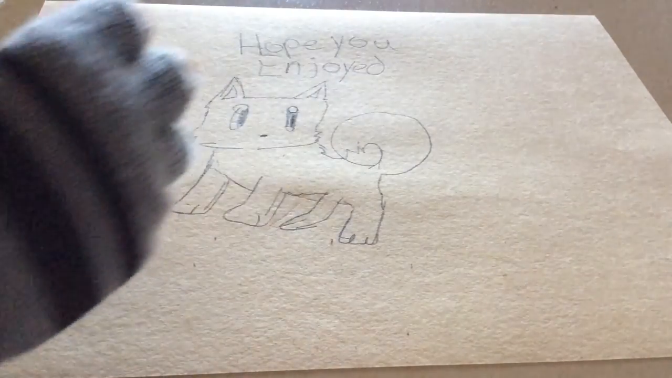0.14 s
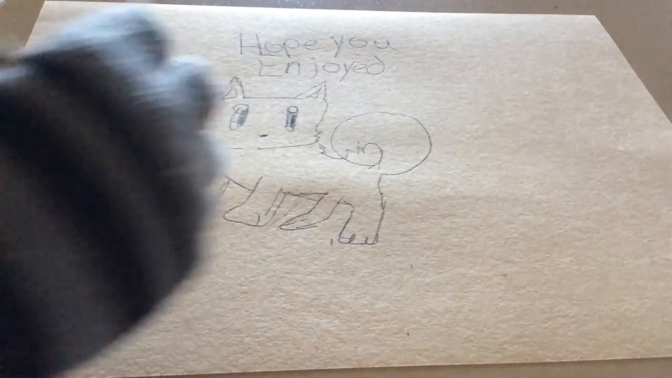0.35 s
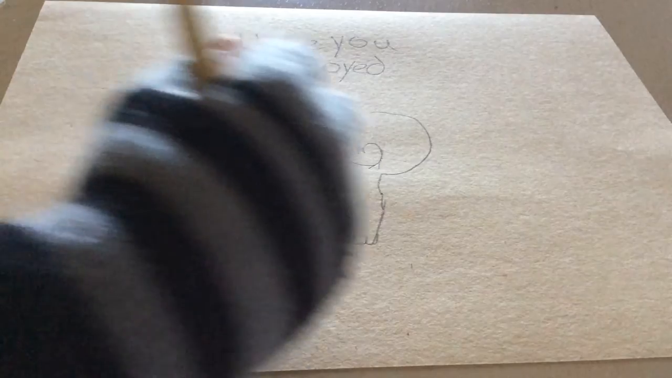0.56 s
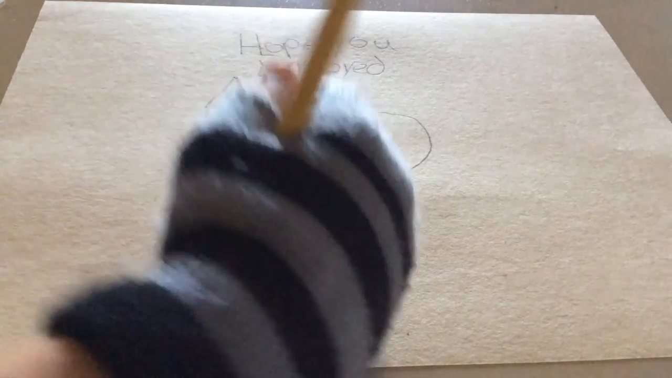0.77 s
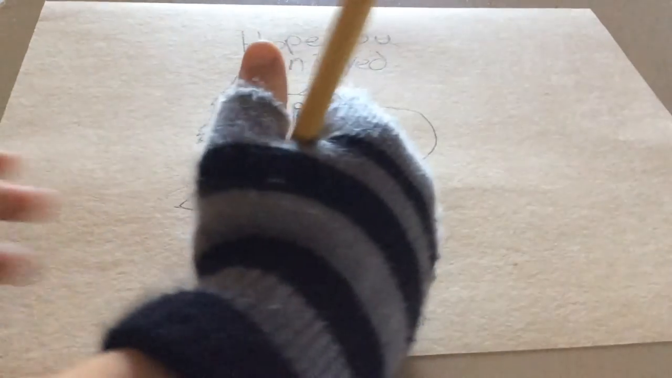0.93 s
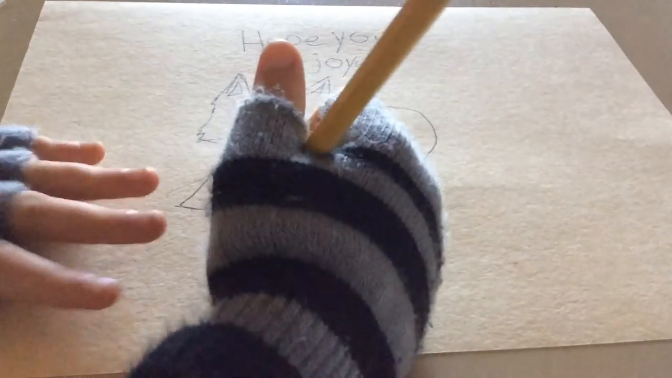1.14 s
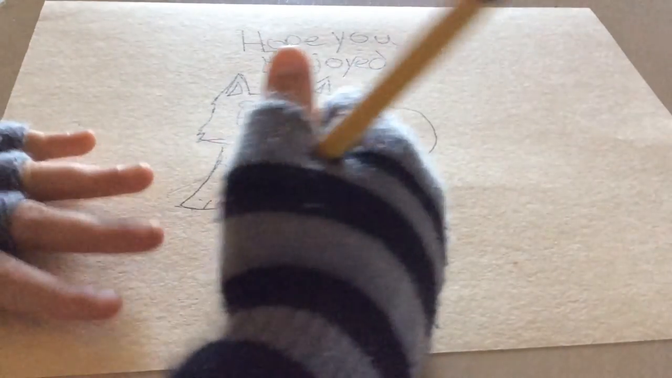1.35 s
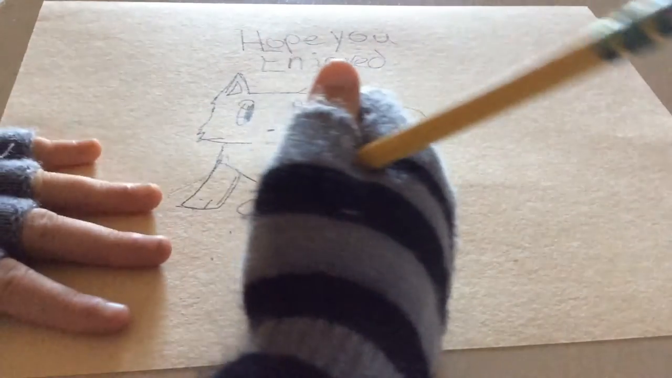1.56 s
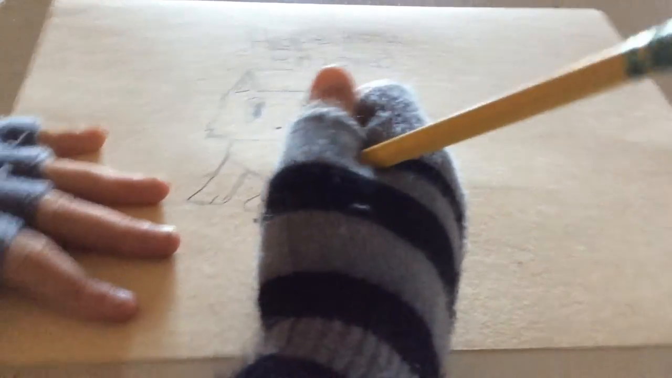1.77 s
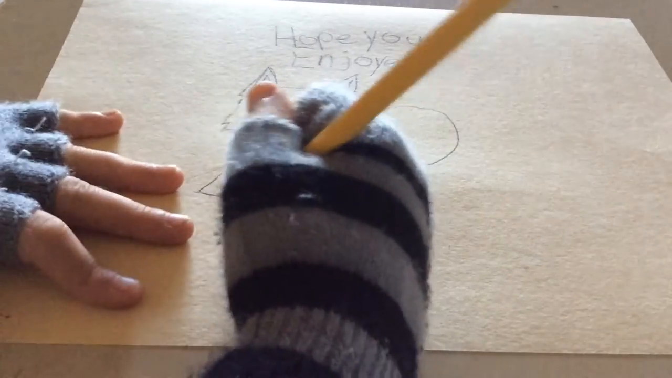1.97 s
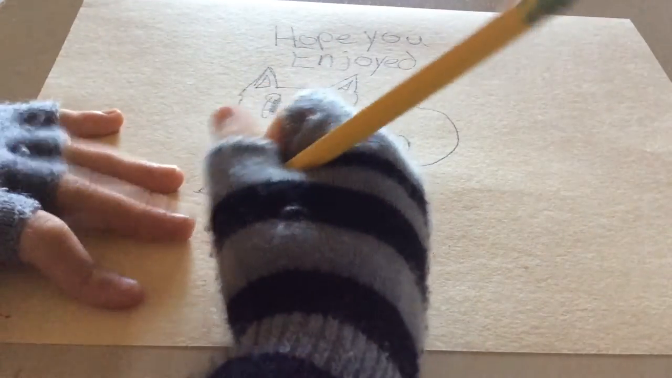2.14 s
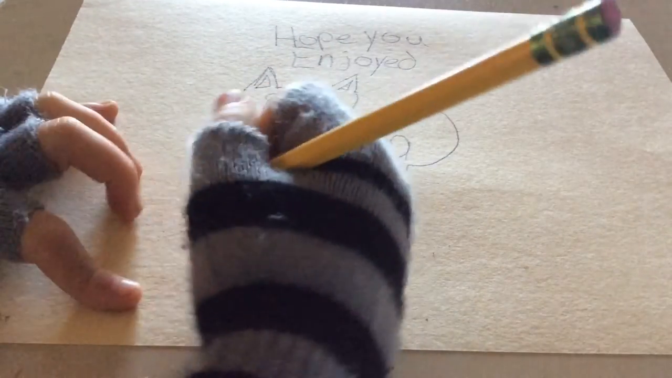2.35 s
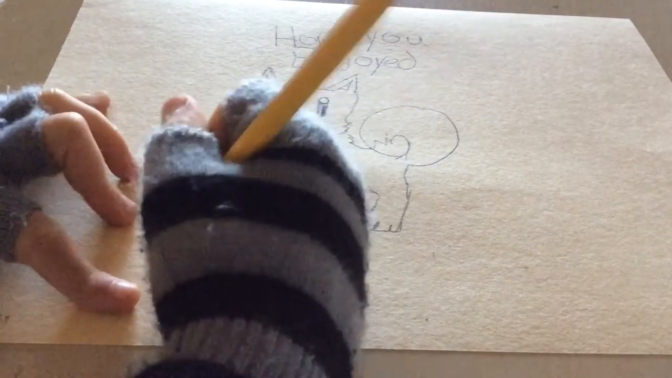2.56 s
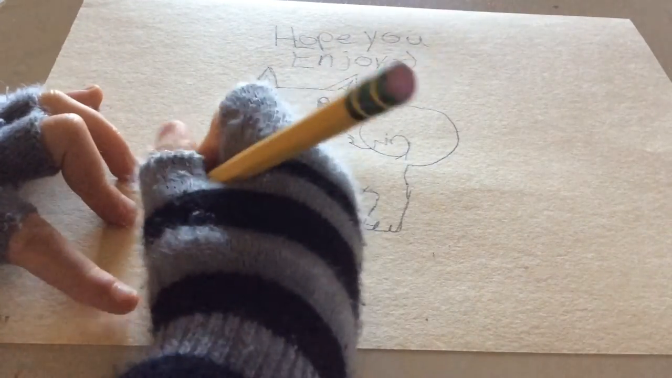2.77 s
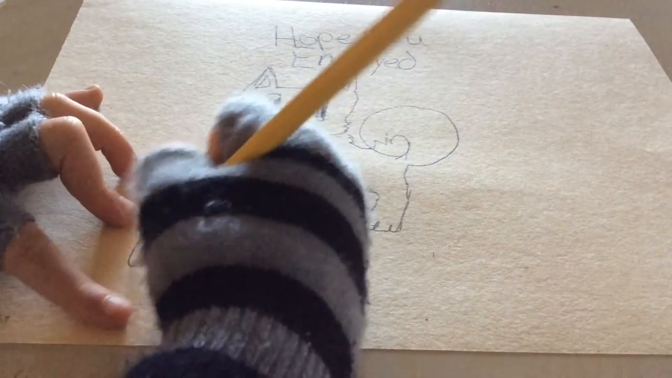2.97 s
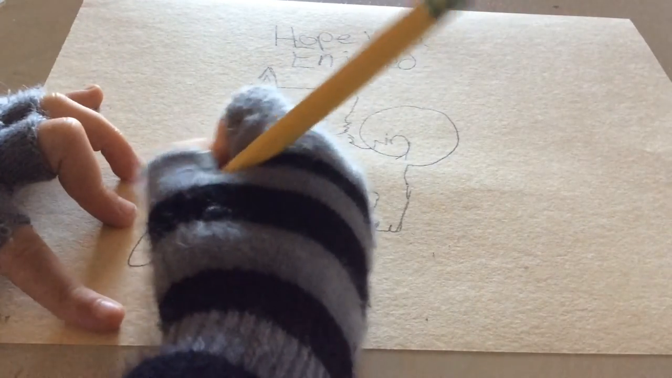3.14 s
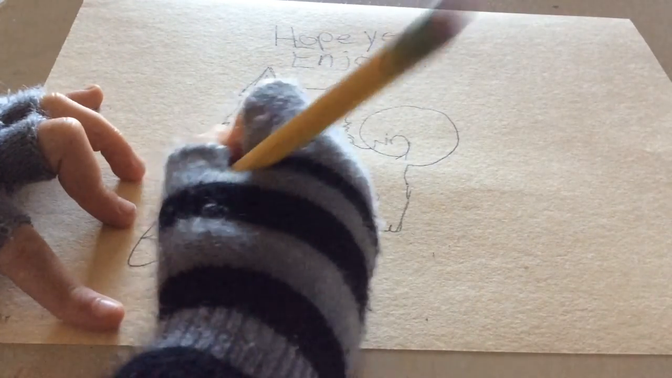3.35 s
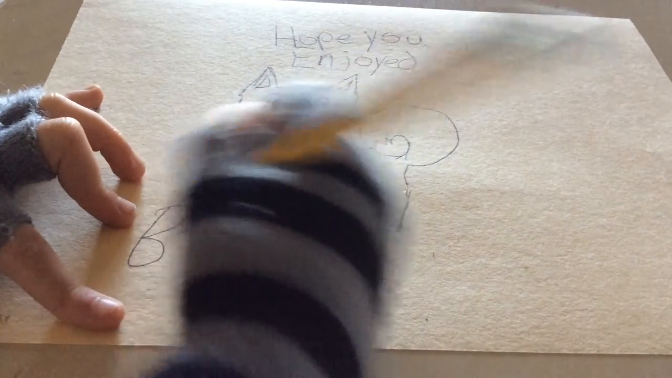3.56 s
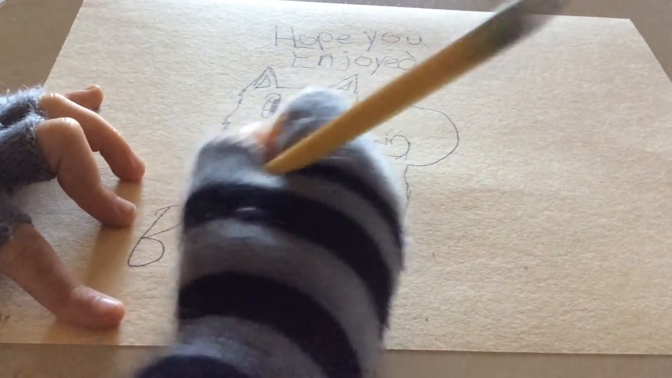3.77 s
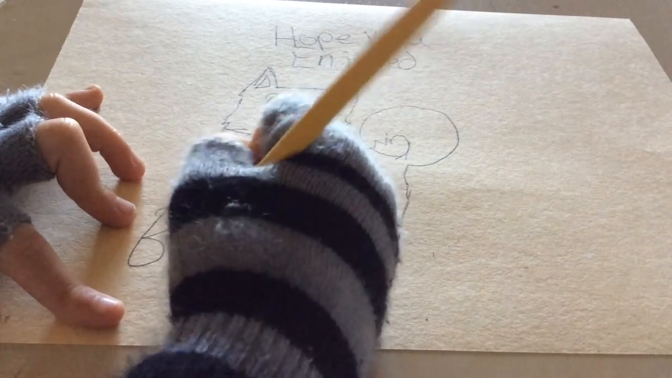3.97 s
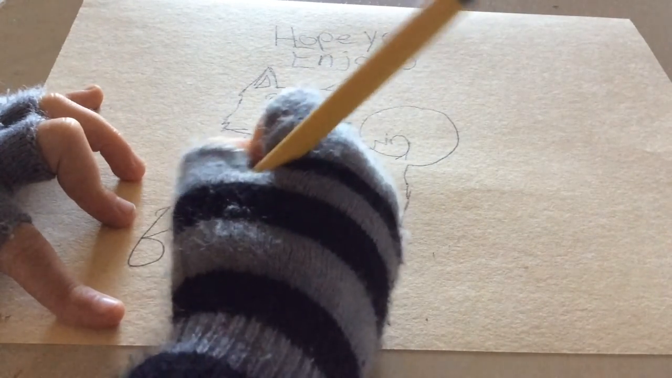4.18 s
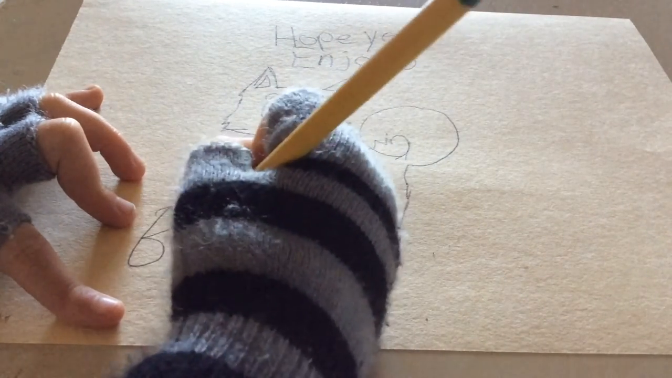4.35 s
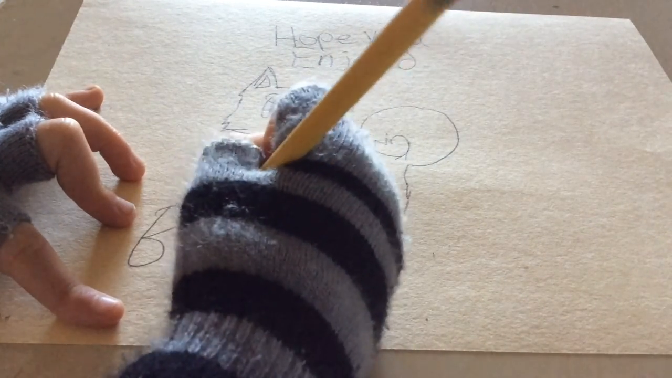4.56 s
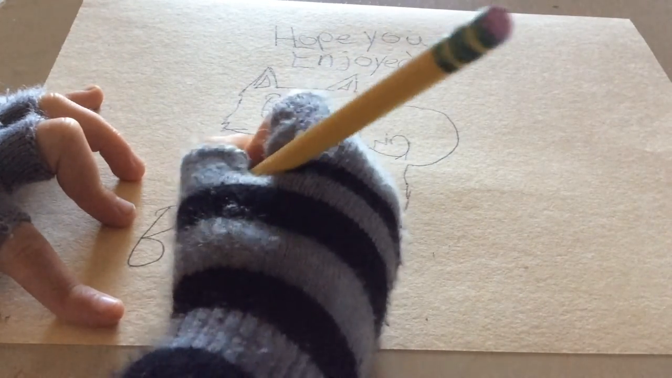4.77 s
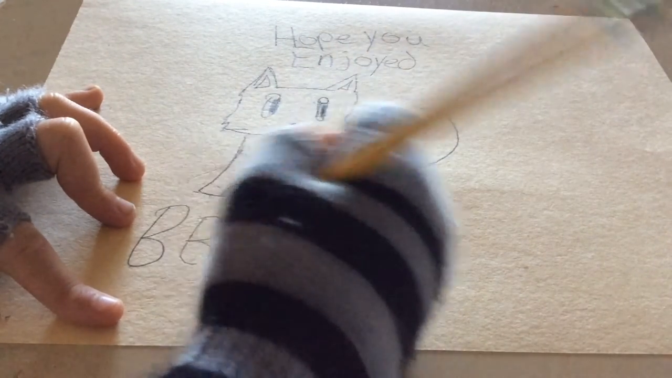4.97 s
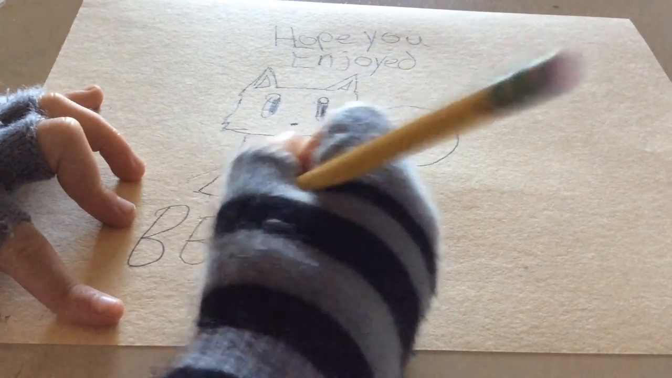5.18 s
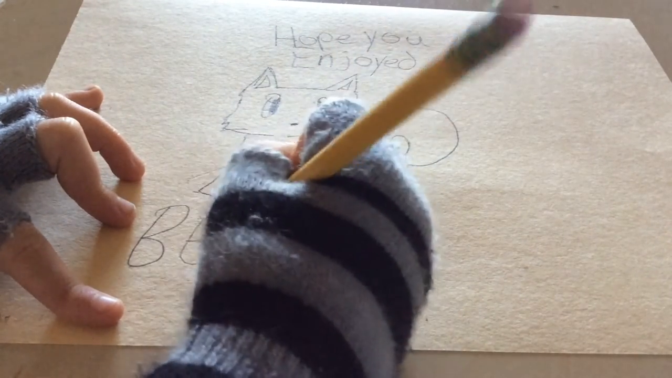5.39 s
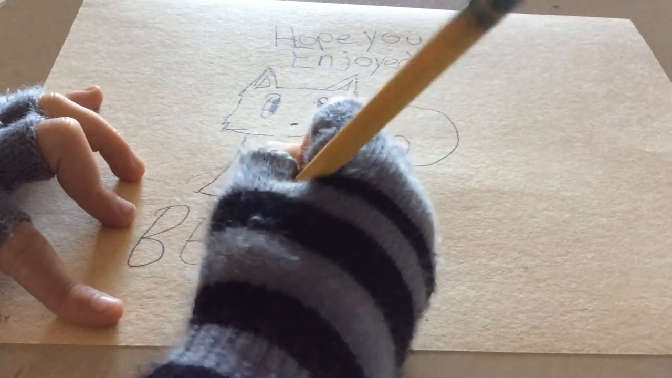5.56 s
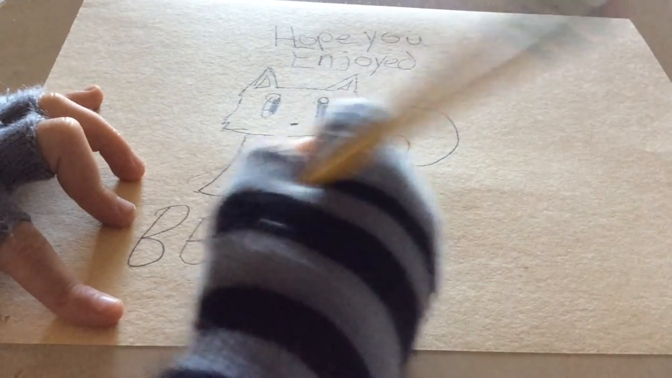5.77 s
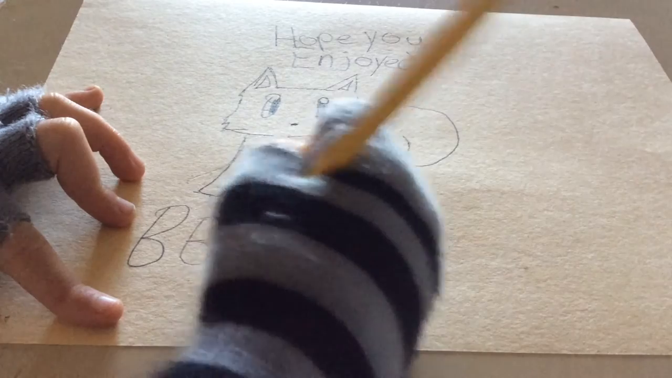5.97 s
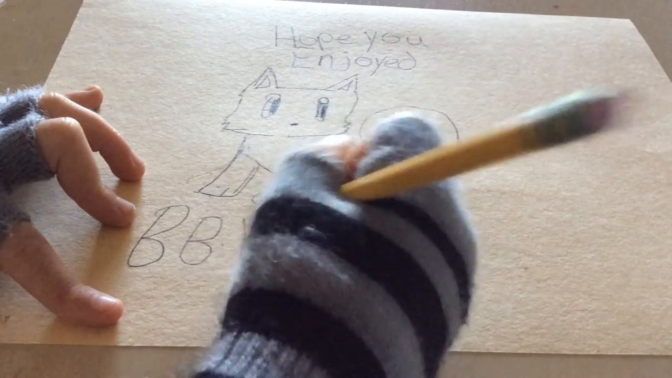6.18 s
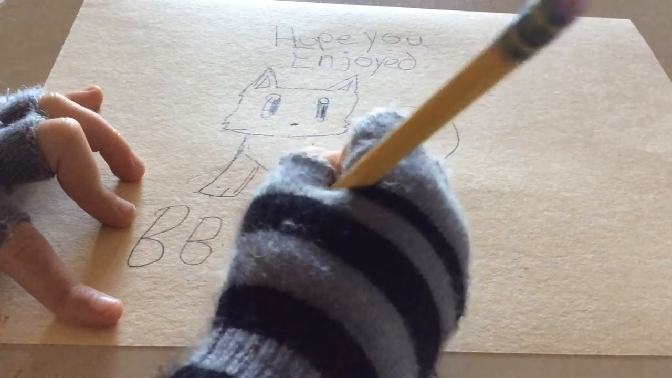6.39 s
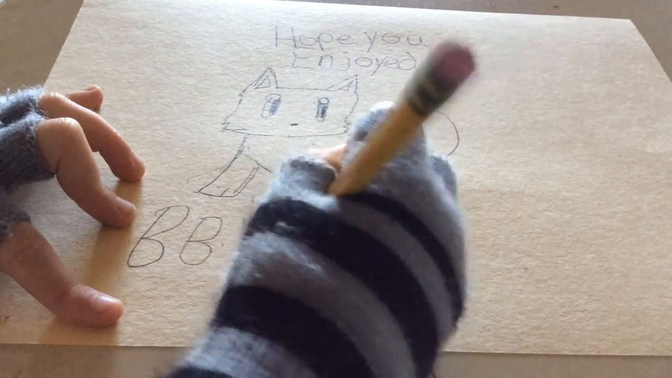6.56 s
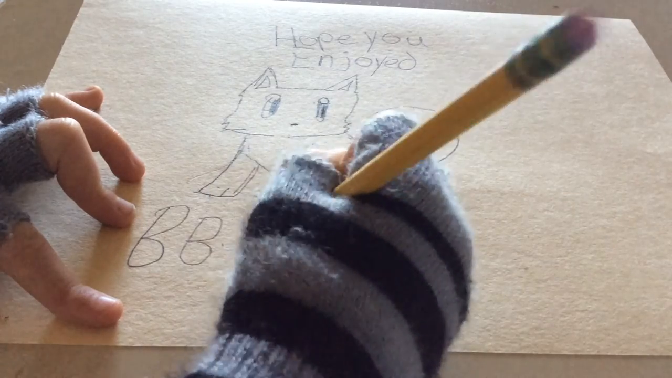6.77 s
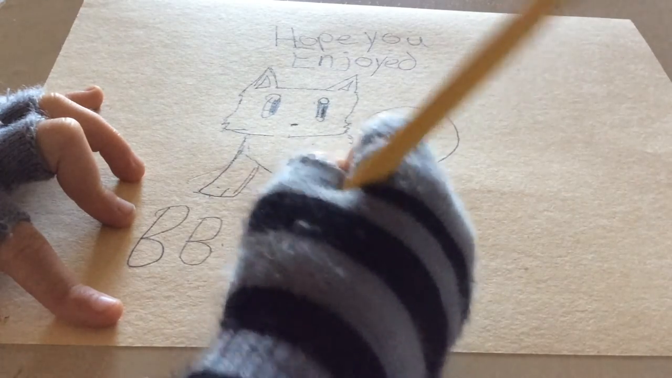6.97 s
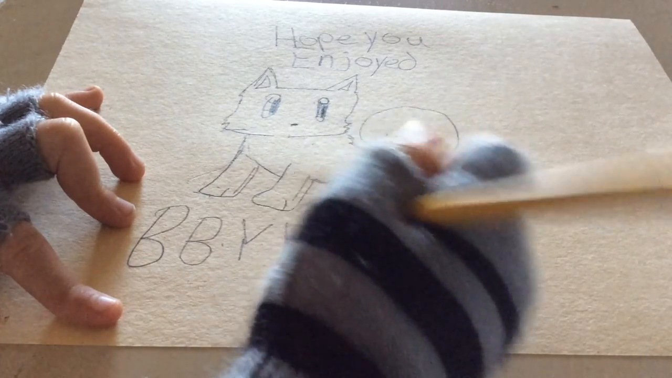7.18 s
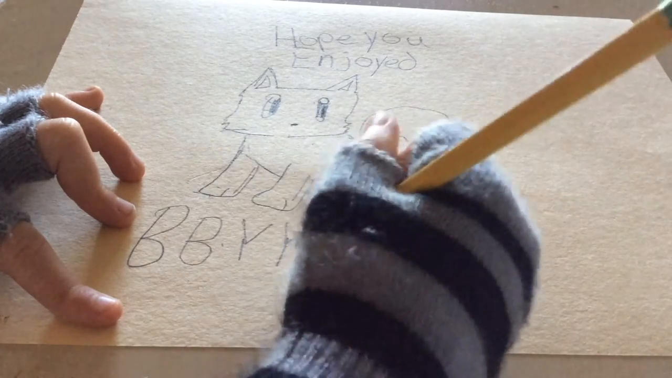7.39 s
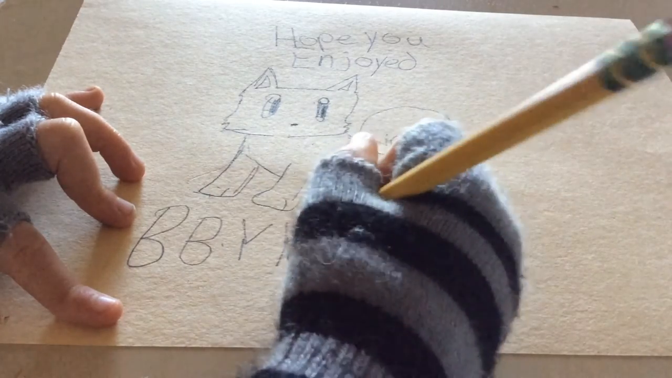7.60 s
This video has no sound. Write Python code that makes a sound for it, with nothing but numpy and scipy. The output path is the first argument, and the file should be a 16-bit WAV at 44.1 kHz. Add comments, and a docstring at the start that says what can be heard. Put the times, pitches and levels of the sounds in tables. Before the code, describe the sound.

Pencil lead taps and scrapes in short irregular bursts on paper over a resonant desk, after soft knit brushing and finger clicks, in a quiet room

```python
"""Pencil writing on a hollow desk

A gloved hand writes with a pencil on a sheet lying on a hollow wooden desk, close to the microphone.
The lead lands with a knock (blows on damped modes), then hisses over the paper grain (coloured friction
noise) while its drag shakes the desk (noise force on the same modes). The knitted glove brushes the sheet
in softer noise, the arm rumbles, and the pencil clicks as it is regripped (short bursts). A quiet room."""
import sys
import numpy as np
from scipy import signal
from scipy.fft import rfft, irfft, next_fast_len
from scipy.io import wavfile
from scipy.ndimage import uniform_filter1d, map_coordinates

SR = 44100
rng = np.random.default_rng(int(sys.argv[2]) if len(sys.argv) > 2 else 0)


def materialize(psi):
    """Save the field psi as 16-bit PCM at rate SR to the path in sys.argv[1].

    A 1-D psi becomes a single channel; in a 2-D psi each row is a channel.
    """
    bounded = np.clip(np.atleast_2d(psi).T, -1, 1)
    quanta = np.round(bounded * 32767).astype(np.int16)
    wavfile.write(sys.argv[1], SR, quanta)


N = 336483

# Strokes of the lead; levels are relative to each layer's own gain:
# (start [s], length [s], fastest point [0-1 of length], heaviest point [0-1 of length], swell depth [dB],
#  hiss [dB], scrape [dB], desk shaking [dB], arm weight [dB], pencil upright [0-1])
STROKES = [ (2.854, 0.1, 0.78, 0.52, 7.5, -57, -56, -38.5, -54, 0.39),
           (2.926, 0.081, 0.36, 0.25, 8.5, -56.5, -60.5, -36, -56, 0.15),
           (3.026, 0.067, 0.74, 0.35, 6, -64.5, -61.5, -41.5, -54, 0.45),
           (3.089, 0.09, 0.73, 0.9, 9, -56.5, -59.5, -52, -61.5, 0.15),
           (3.174, 0.079, 0.55, 0.5, 7.5, -67.5, -63, -52, -57.5, 0.38),
           (3.292, 0.095, 0.62, 0.41, 15.5, -54, -58.5, -40, -59, 0.5),
           (3.366, 0.085, 0.3, .45, 8.5, -62, -59.5, -49, -57, 0.38),
           (3.447, 0.12, .45, 0.17, 14, -61.5, -63, -49.5, -55, 0.4),
           (3.894, 0.082, 0.56, 0.52, 8.5, -53, -57, -37, -58, 0.56),
           (3.976, 0.07, 0.66, 0.96, 9, -66.5, -68, -53.5, -61, 0.5),
           (4.04, 0.055, 0.8, 0.38, 5, -71, -67.5, -50.5, -56, 0.5),
           (4.089, 0.06, 0.9, 0.66, 7.5, -57.5, -63, -52.5, -56, 0.57),
           (4.149, .12, 0.16, 0.31, 9.5, -64.5, -60.5, -49, -53.5, 0.38),
           (4.312, 0.064, 0.9, 0.32, 8, -70, -70, -57.5, -62, 0.4),
           (4.469, 0.11, 0.61, 0.46, 12, -66, -65, -50, -67, 0.34),
           (4.582, 0.12, 0.17, 0.52, 7.5, -61.5, -61.5, -53.5, -64, 0.77),
           (4.714, 0.11, 0.9, 0.25, 6.5, -65, -64.5, -55, -59.5, 0.44),
           (4.845, 0.026, .5, 0.3, 4, -73, -76, -65, -73, 0.85),
           (5.361, 0.18, 0.6, 0.47, 12, -65, -61.5, -49.5, -59, 0.69),
           (5.592, 0.071, 0.8, 0.44, 10.5, -53.5, -55, -38.5, -57, 0.5),
           (5.905, 0.074, .3, 0.34, 8, -56.5, -59, -41, -53.5, 0.9),
           (6.354, 0.1, 0.47, 0.53, 9, -63.5, -61, -48.5, -60, 0.66),
           (6.494, .11, 0.5, 0.52, 10.5, -61, -58, -51.5, -56, 0.53),
           (6.63, 0.027, .2, 0.5, 9, -71, -80, -68, -80, 0.6),
           (6.883, 0.075, 0.54, 0.53, 4.5, -60, -60, -40, -52, 0.8),
           (7.026, 0.014, .4, 0.6, 2.5, -70, -81, -65, -62, 0.5), ]
# Glove sliding on the sheet: (start [s], length [s], fastest point [0-1 of length], swell depth [dB],
#  brush [dB], fine fizz [dB], drag into the desk [dB], arm weight [dB])
GLOVE = [ (0.0, .07, 0.4, 6, -76.5, -75, -68, -63), (0.273, 0.22, 0.8, 1, -83, -86, -89, -85),
         (0.595, .25, 0.2, 5, -85, -89, -80, -79), (0.858, .1, 0.4, 6, -77.5, -70, -84, -73.5),
         (0.965, 0.089, 0.07, 10.5, -77, -80, -70, -63), (1.114, 0.11, 0.4, 4, -79, -75, -100, -82),
         (1.327, 0.076, 0.33, 6, -72.5, -73, -62, -64), (1.408, 0.056, .5, 2.5, -72.5, -73, -71, -60),
         (1.484, 0.079, 0.1, 4, -87, -83, -69, -58.5), (1.622, 0.15, 0.36, 5, -74.5, -78, -70, -71),
         (1.759, 0.21, .35, 7.5, -69, -62.5, -79, -69), (1.96, 0.2, 0.13, 12, -75.5, -77, -85, -77),
         (2.164, 0.15, 0.22, 5, -76, -75, -69.5, -73), (2.303, 0.14, 0, 5.5, -65.5, -65.5, -56.5, -72),
         (2.413, 0.18, .2, 6, -68, -68.5, -58, -78), (2.531, .2, 0.4, 10, -72.5, -72.5, -68, -66.5),
         (3.6, 0.099, 0.33, 14, -69, -69, -68, -69), (3.707, 0.047, 0.54, 8, -82, -89, -69, -70),
         (4.9, 0.1, 0.57, 6, -65, -64, -70, -78), (5.011, 0.074, 0.5, 8, -73, -76, -80, -87),
         (5.113, 0.16, 0, 4, -79, -82, -90, -68.5), (5.665, 0.066, 0.6, 2.5, -76, -73, -66.5, -67),
         (5.987, 0.056, 0.36, 2.5, -81, -79, -65.5, -64), (6.07, .11, 0.74, 8, -64.5, -65, -80, -82),
         (6.234, .075, 0.7, 3, -72, -77, -71, -76), (6.611, 0.28, 0, 6, -76, -88, -76, -71),
         (6.985, 0.049, 0.4, 4, -77.5, -84, -62, -74), (7.091, .11, .7, 4, -68.5, -70.5, -78, -78),
         (7.231, 0.15, 0.8, 4.5, -71.5, -74, -73.5, -75), (7.386, 0.12, 0.5, 4.5, -68, -67, -65.5, -86),
         (7.494, 0.021, 0.35, 5, -76, -85, -52.5, -72), ]
# Damped modes of the hollow desk: (frequency [Hz], width [Hz], level [dB])
DESK = [(119, 17, -15.5), (307.7, 22.6, 3), (418.6, 60, -1), (575, 64, -3.5), (716, 42, -9), (840, 29, -18),
        (986, 41, -20.5), (1320, 205, -27.5), (1486, 480, -35.5)]
# Spectrum of the lead's hiss: (frequency [Hz], level [dB per Hz])
LEAD = [(3820, -54), (6500, -12), (6870, -21), (8010, -4.5), (9480, -1.5), (10300, -9.5), (11100, -2),
        (11600, -3), (12800, -17), (14700, -15.5), (15600, -19.5)]
# Spectrum of the scrape with the pencil held upright: (frequency [Hz], level [dB per Hz])
STEEP = [(530, -4.5), (900, 5), (964, -29), (1190, -4), (1290, -3.5), (1430, -1), (1850, -12), (2270, -11),
         (2700, -9.5), (3150, -7), (3500, -3.5), (3800, -8), (4220, -12.5), (5550, -8), (7000, -39),
         (9100, -54), (15400, -120)]

LEAD_ATTACK_S, LEAD_RELEASE_S = 0.0097, 0.0093
GLOVE_ATTACK_S, GLOVE_RELEASE_S = 0.016, 0.0075


def amp(db):
    """Decibel law: the amplitude gain of a level in dB."""
    return 10 ** (np.asarray(db) / 20)


def unit(x):
    """Normalisation by power: x at rms 1."""
    return x / np.sqrt(np.mean(x ** 2) + 1e-20)


def level_curve(rows, fade):
    """Envelope by interpolation in dB: (time, level) rows to gains, fading at both ends over fade seconds."""
    t = np.arange(N) / SR
    s, db = np.transpose(rows)
    edge = np.clip(np.minimum(t - s[0], s[-1] - t) / fade + .5, 0, 1)
    return edge * amp(np.interp(t, s, db))


def filtered(x, response):
    """Linear filtering: the spectrum of x times a complex response of frequency."""
    m = next_fast_len(N + SR // 2)
    return irfft(rfft(x, m) * response(np.fft.rfftfreq(m, 1 / SR)), m)[:N]


def coloured(x, points):
    """Spectral shaping: x through (Hz, dB) points joined on a log frequency axis, at rms 1."""
    f, v = np.transpose(points)
    return unit(filtered(x, lambda hz: amp(np.interp(np.log(hz + 1), np.log(f + 1), v))))


def resonant(x, modes):
    """Modal superposition: x rings damped modes of alternating sign; white noise keeps its rms."""
    def body(f):
        total = 0
        for k, (centre, width, db) in enumerate(modes):
            damping = 1j * f * width
            total = total + (-1) ** k * amp(db) * damping / (centre * centre - f * f + damping)
        return total

    power = np.mean(np.abs(body(np.linspace(0, SR / 2, 4096))) ** 2)
    return filtered(x, body) / np.sqrt(power)


def wobble(rate):
    """Slow random modulation: a smooth curve through rate random knots a second."""
    return map_coordinates(rng.standard_normal(int(N * rate / SR) + 4), [np.arange(N) * rate / SR])


def grainy(uneven_db, patchy_db, size):
    """Friction noise: fibres catch with uneven strength; narrow bands stand out for size frames."""
    z = signal.stft(rng.standard_normal(N), nperseg=512)[2]
    field = uniform_filter1d(rng.standard_normal(z.shape), size=2, axis=0)
    field = uniform_filter1d(field, size=size, axis=1)
    x = signal.istft(z * amp(patchy_db * unit(field)), nperseg=512)[1][:N]
    return unit(x * amp(uneven_db * wobble(400)))


def puffs(times, dbs, lengths):
    """Transient excitation: noise bursts with a quick rise and an exponential fall."""
    x, t = np.zeros(N + SR), np.arange(SR // 10) / SR
    for s, db, length in zip(times, dbs, np.maximum(lengths, 1e-4)):
        envelope = (1 - np.exp(-t / (0.1 * length))) * np.exp(-t / length)
        x[round(s * SR):][:len(t)] += amp(db) * envelope * rng.standard_normal(len(t))
    return x[:N]


def swells(start, length, peak, swell_db, db, attack, release):
    """Gesture envelope: each movement starts, swells to its peak, sinks and decays exponentially."""
    rounding = 1.09  # 1 = pointed swell, more = a flatter top with steeper flanks
    out = np.zeros(N + SR)
    length, peak = np.maximum(length, .005), np.clip(peak, .02, .98)
    for s, span, at, depth, top in np.broadcast(start, length, peak, swell_db, db):
        t = np.arange(int((span + 8 * release) * SR)) / SR
        place = t / span
        away = np.clip(np.maximum(1 - place / at, (place - at) / (1 - at)), 0, 1)
        edge = np.clip(t / attack, 0, 1) * np.exp(-np.maximum(t - span, 0) / release)
        out[round(abs(s) * SR):][:len(t)] += amp(top - depth * away ** rounding) * edge
    return out[:N]


def room():
    """Stationary background noise: room tone and microphone hiss share one broad spectrum."""
    # spectrum of the quiet room: (frequency [Hz], level [dB per Hz])
    room_points = [(13, -35), (22, -6), (59, 5), (97, 1.5), (393, -1.5), (562, -9.5), (681, -6),
                   (974, -13.5), (2220, -15.5), (4290, -20), (4920, -18.5), (7030, -22), (9260, -16.5),
                   (12200, -24.5), (15600, -34.5)]
    return amp(-71.5) * coloured(grainy(uneven_db=-2.1, patchy_db=1.5, size=6), room_points)


def arm():
    """Structure-borne noise: the arm's weight rumbles in the desk with every stroke and slide."""
    # spectrum of the rumble: (frequency [Hz], level [dB per Hz])
    rumble_points = [(21, -30), (35, -9.5), (118, -0.5), (136, 0.5), (178, -10.5), (241, -13.5),
                     (260, -5.5), (340, -17.5), (570, -120)]
    depth, release_s = 0.87, .02  # depth of the swell over the tabulated one
    s, length, _, heaviest, swell_db, *_, weight_db, _ = np.transpose(STROKES)
    strokes = swells(s, length, heaviest, depth * swell_db, weight_db, LEAD_ATTACK_S, release_s)
    s, length, fastest, swell_db, *_, weight_db = np.transpose(GLOVE)
    slides = swells(s, length, fastest, depth * swell_db, weight_db, GLOVE_ATTACK_S, release_s)
    weight = amp(-87.5) + strokes + slides  # the constant is the arm at rest
    return weight * amp(3.5 * wobble(12)) * coloured(rng.standard_normal(N), rumble_points)


def hand():
    """Soft friction: wool brushes the sheet and drags on the desk; the sleeve rubs the desk edge."""
    # spectra of the knit's brush, its fine fizz and the sleeve's rub: (frequency [Hz], level [dB per Hz])
    knit_points = [(530, -37), (900, -2), (1030, -1), (1110, 0), (1300, -0.5), (1940, -3.5), (2670, 0.5),
                   (3380, -4.5), (4950, 1), (5500, -1), (6660, -12.5), (7200, -37), (9360, -41),
                   (15800, -120)]
    fuzz_points = [(3820, -40), (6500, -8), (7050, -4.5), (10800, -3), (12400, -7.5), (13600, -23),
                   (14700, -30), (15600, -2)]
    rub_points = [(400, -9), (520, 3), (640, 2), (780, 3.5), (880, -36), (1100, -44)]
    # sleeve dragged over the desk edge: (time [s], level [dB])
    sleeve_levels = [(0.25, -103), (0.3, -79), (0.39, -83), (0.518, -82), (0.532, -105), (0.58, -73),
                     (0.83, -70), (0.938, -86), (0.95, -72)]
    # a faint narrow band of noise that hangs on after a stroke: (time [s], level [dB])
    hush_levels = [(6.58, -57), (6.616, -75), (6.706, -85), (6.82, -73)]
    s, length, fastest, swell_db, brush_db, fizz_db, drag_db, _ = np.transpose(GLOVE)

    def slide(depth, db):
        return swells(s, length, fastest, depth * swell_db, db, GLOVE_ATTACK_S, GLOVE_RELEASE_S)

    def soft(points):
        return coloured(grainy(uneven_db=.8, patchy_db=1.5, size=6), points)

    brush, fizz, drag = slide(1, brush_db), slide(1.6, fizz_db), slide(3.8, drag_db)
    wool = brush * soft(knit_points) + fizz * soft(fuzz_points)
    desk = resonant(drag * rng.standard_normal(N), DESK)
    sleeve = level_curve(sleeve_levels, fade=0.027) * soft(rub_points)
    narrow = soft([(1000, -40), (1180, 0), (1420, 1), (1650, -36)])
    hush = level_curve(hush_levels, fade=0.098) * narrow
    return hush + wool + desk + sleeve


def clicks():
    """Impulsive contact: a burst into the shaft, one hard snap, a crunch of paper, an airy top and the desk."""
    # pencil clicking against nail and fingers; part levels are relative to the click's own:
    # (time [s], level [dB], snap [dB], snap frequency [Hz], crunch [dB], top [dB])
    click_rows = [(0.005, -56, -20, 2250, -18, -21), (0.048, -57, -16, 2220, -18, -20),
                  (0.144, -66, -4, 2820, -2.5, -13), (1.358, -54, -9, 2480, -9.5, -20),
                  (1.395, -53.5, -2.5, 3780, -9.5, -7), (1.491, -47, -30, 2430, -34, -24),
                  (1.601, -58.5, -22, 2220, -16, -20), (1.644, -54, -18, 2640, -15.5, -21),
                  (1.651, -50.5, -14, 3470, -30, -22), (1.68, -47.5, -19, 2420, -18, -20),
                  (1.686, -56, -5, 2850, -26, -18), (1.744, -43, -20.5, 2550, -20.5, -25),
                  (1.753, -52, -17, 2570, -16, -19), (1.918, -57, -5, 4830, -12, -17),
                  (2.227, -68, -1, 3900, -10, -10), (2.325, -45.5, -5.5, 4900, -9.5, -13),
                  (2.329, -44.5, -3.5, 2200, -9.5, -17), (2.41, -45.5, -10, 2500, -13, -7),
                  (2.4212, -37, 7, 4300, -12.5, -25), (2.426, -47, -2, 3770, -11, -5),
                  (2.59, -56.5, -5, 4910, -14.5, -5), (3.023, -60, -11, 2200, -1, -15),
                  (3.636, -59, -6, 4480, -10, 4), (5.509, -57, -16, 3440, -4.5, -5),
                  (5.716, -66, -15, 2330, -13, 2), (7.417, -60.5, 0, 4600, -10, -17)]
    # bending modes of the shaft: (frequency [Hz], width [Hz], level [dB])
    shaft_modes = [(290, 92, 16), (1110, 230, -2), (1390, 260, -16)]
    s, db, snap_db, snap_hz, crunch_db, top_db = np.transpose(click_rows)
    length = np.full(len(s), 0.0031)  # decay of a click [s]

    snap, t = np.zeros(N), np.arange(SR // 50) / SR
    for start, level_db, hz in zip(s, db + snap_db, snap_hz):
        cycles = hz * t
        tone = np.sin(2 * np.pi * cycles)
        ring = tone * cycles * np.exp(-cycles / 1.31)  # a few cycles of the hard contact
        rough = uniform_filter1d(rng.standard_normal(len(t)), size=12)
        after = 0.091 * np.exp(-t / 0.003) * tone * rough
        snap[round(start * SR):][:len(t)] += amp(level_db + 12.5) * (ring + after)

    impulses = np.bincount(np.round(s * SR).astype(int), amp(db + 17), N)
    bending = resonant(puffs(s, db + 1, length) + impulses, shaft_modes)
    shaft = resonant(bending, [(1150, 980, 0)])
    top = resonant(puffs(s, db + top_db + 3.5, 0.41 * length), [(9400, 1900, 0)])
    crunch_modes = [(710, 360, 5.0), (1820, 5300, -5.5), (4450, 3100, -6.5)]
    crunch = resonant(puffs(s, db + crunch_db + 8.5, 1.5 * length), crunch_modes)
    palm_modes = DESK[:3] + [(218, 50, 0)]  # the palm adds a duller mode
    desk = resonant(puffs(s, db + crunch_db + 13.5, length), palm_modes)
    return amp(-13.5) * shaft + snap + crunch + top + desk


def taps():
    """Impact on a modal body: a soft blow rings the desk and thuds it on its legs; the point ticks and skids."""
    # lead or hand landing on the desk, or the point jolting in a stroke; part levels are relative to the tap's:
    # (time [s], level [dB], tick [dB], skid hiss [dB], boom [dB])
    tap_rows = [(0.033, -58.5, -7, -23, 11), (0.957, -42.5, -22, -34, -6), (1.421, -55, -17, -13, 9),
                (1.476, -42.5, -43, -39, -2.5), (2.195, -52, -21, -23, -24),
                (2.781, -19.5, -32, -37.5, -17), (3.496, -29.5, -43, -31, -41),
                (3.84, -20.5, -37, -39, -16), (4.238, -51.5, -12, -10, 9), (5.256, -21.5, -38.5, -44, -15),
                (5.833, -17.5, -44, -33.5, -18), (6.303, -27.5, -33, -46, -13),
                (6.534, -32.5, -19.5, -21, -19), (6.805, -34, -30, -21, -9), (6.896, -34, -26, -25, -16),
                (6.928, -29.5, -33, -30, -15)]
    s, db, tick_db, skid_db, boom_db = np.transpose(tap_rows)
    blows, booms, at = np.zeros(N), np.zeros(N), np.round(s * SR).astype(int)
    blows[at] = amp(db + 15.5)
    booms[at] = amp(db + boom_db + 22)

    def push(f):
        return -1 / (1 + 1j * f / 1400) ** 2  # a soft contact: treble falls off above 1400 Hz

    legs = amp(-20) * resonant(blows, [(79, 7.7, 0)])
    body = resonant(blows, DESK) + resonant(booms, DESK[:1]) + legs
    scatter = resonant(puffs(s, db - 17, np.full(len(s), 0.0069)), DESK)  # noise burst in the desk
    tick_bursts = puffs(s, db + tick_db + 0.5, np.full(len(s), 0.0065))
    tick = resonant(tick_bursts, [(1100, 1200, 2), (1850, 2100, -1)])

    skid_s = 0.025
    slip = swells(s, skid_s, 0.24, 6.1, db + skid_db - 10.5, .003, 0.0052)
    hiss = coloured(rng.standard_normal(N), LEAD)
    scrape = coloured(rng.standard_normal(N), STEEP)
    skid = slip * (hiss + amp(-1) * scrape)
    # the desk murmurs on after a landing
    settle = swells(s, skid_s, .5, 0, db - 38, LEAD_ATTACK_S, release=0.086) * rng.standard_normal(N)
    return filtered(body, push) + scatter + resonant(settle, DESK) + tick + skid


def lead():
    """Stick-slip friction: the lead drags over the grain, hissing in the air and forcing the desk unevenly."""
    # spectrum of the scrape with the pencil held low: (frequency [Hz], level [dB per Hz])
    flat_points = [(530, -9), (900, 0.5), (1110, 3), (1200, 2), (1320, -6.5), (1430, -7.5), (1800, -10.5),
                   (2270, -3.5), (2540, -14.5), (3260, -14.5), (4220, -24), (5230, -3.5), (7000, -38.5),
                   (9100, -57), (15400, -120)]
    s, length, fastest, heaviest, swell_db, hiss_db, scrape_db, shake_db, _, upright = np.transpose(STROKES)

    def stroke(peak, depth, db):
        return swells(s, length, peak, depth * swell_db, db, LEAD_ATTACK_S, LEAD_RELEASE_S)

    def grain(points):
        return coloured(grainy(uneven_db=2, patchy_db=1.8, size=10), points)

    hiss = stroke(fastest, 1, hiss_db)
    scrape = stroke(fastest, 0.81, scrape_db)
    shake = stroke(heaviest, 2.06, shake_db)
    # equal-power blend of the two scrapes as the pencil tilts
    tilt = np.interp(np.arange(N) / SR, s + length / 2, upright)
    turn = np.pi / 2 * np.clip(tilt, 0, 1)
    paper = np.cos(turn) * grain(flat_points) + np.sin(turn) * grain(STEEP)
    catch = amp(0.56 * wobble(45))  # the point catches and slips on the grain
    air = hiss * coloured(grainy(uneven_db=1.5, patchy_db=4.0, size=8), LEAD) + scrape * paper
    force = shake * catch * amp(1.15 * wobble(130)) * rng.standard_normal(N)
    return amp(2.0) * catch * air + resonant(force, DESK)


def scene():
    """Superposition: the pressures of all sources add at one close microphone."""
    return (room() + arm() + hand() + clicks() + taps() + lead())[None]


def record(dry):
    """Band limiting: the recorder keeps nothing at or above 15400 Hz."""
    return filtered(dry[0], lambda hz: hz < 15400)[None]


dry = scene()
out = record(dry)
materialize(out)
```